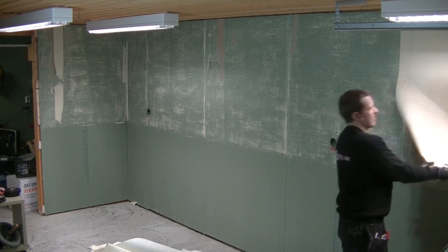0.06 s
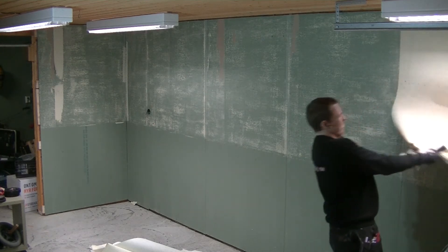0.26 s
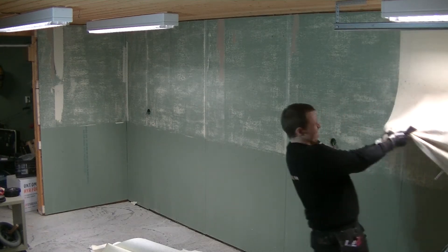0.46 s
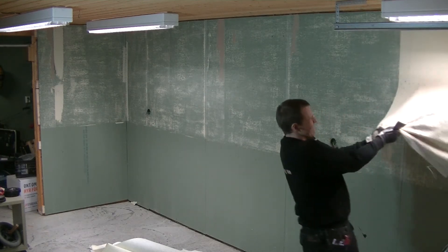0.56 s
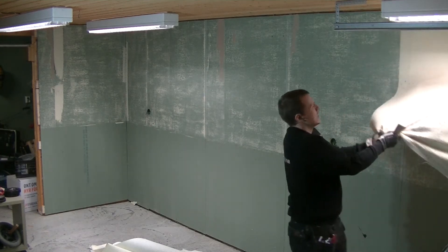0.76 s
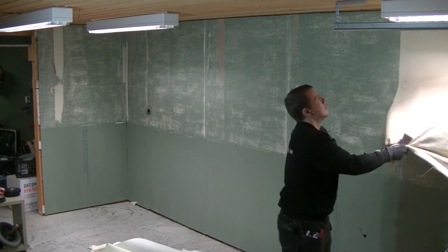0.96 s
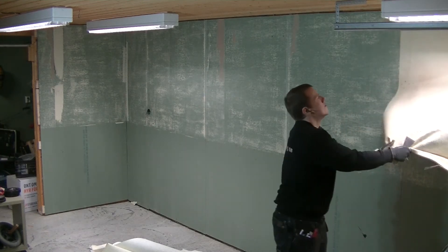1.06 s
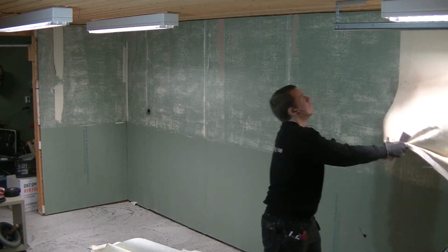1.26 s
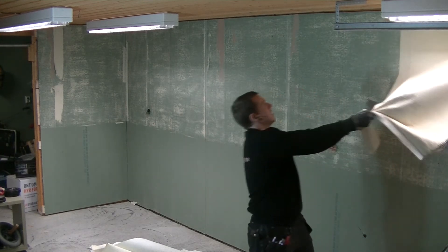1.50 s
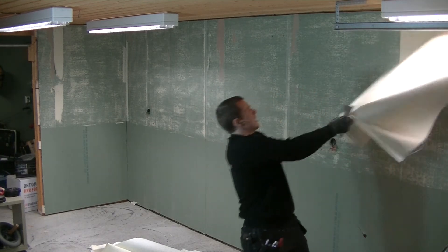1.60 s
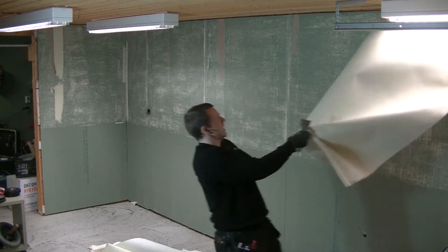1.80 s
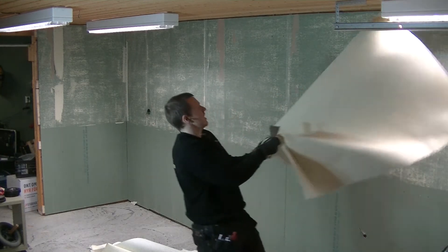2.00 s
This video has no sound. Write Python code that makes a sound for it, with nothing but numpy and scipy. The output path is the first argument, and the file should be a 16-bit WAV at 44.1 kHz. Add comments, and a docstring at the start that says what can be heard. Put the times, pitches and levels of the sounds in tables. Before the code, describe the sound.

Wall covering is ripped off a garage wall in two loud, crackling pulls. The sheet rustles and cracks taut first, crinkles faintly between the pulls, then flaps and scrapes lightly. The bare room adds a short echo.

```python
"""A slack sheet of wall covering rustles, cracks taut and is torn off a garage wall in two long pulls.
Glue and paper fibres part by stick-slip, in dense, jerky snaps that rattle the sheet and drum on the
wallboard. Between pulls the sheet crinkles as it buckles, and two small ticks sound close by.
After the second pull it flaps and scrapes. The bare room reverberates over a faint, steady hush."""
import sys
import numpy as np
from scipy import signal
from scipy.fft import rfft, irfft
from scipy.io import wavfile
from scipy.ndimage import uniform_filter1d, minimum_filter1d

SR = 44100
rng = np.random.default_rng(int(sys.argv[2]) if len(sys.argv) > 2 else 0)


def materialize(psi):
    """Save the field psi as 16-bit PCM at rate SR to the path in sys.argv[1].

    A 1-D psi becomes a single channel; in a 2-D psi each row is a channel.
    """
    bounded = np.clip(np.atleast_2d(psi).T, -1, 1)
    quanta = np.round(bounded * 32767).astype(np.int16)
    wavfile.write(sys.argv[1], SR, quanta)


N = 90404
T = np.arange(N) / SR
HZ = np.maximum(np.fft.rfftfreq(N, 1 / SR), 1)


def undb(db):
    """Amplitude ratio: tenfold for every 20 dB."""
    return 10 ** (np.asarray(db) / 20)


def unit(x):
    """Normalisation to an rms of 1."""
    return x / np.sqrt(np.mean(x ** 2))


def at_hz(points, hz):
    """Interpolation of (f/Hz, value) points on a log-frequency axis."""
    f, value = np.array(points).T
    return np.interp(np.log(hz), np.log(f), value)


def colour(x, tone, band=1):
    """Spectral shaping of a white signal at constant power: the levels of a tone are relative."""
    return irfft(rfft(x) * unit(undb(at_hz(tone, HZ)) * band), N)


def envelope(rows, column, edge_s=.006):
    """Amplitude envelope from a level curve, with exponential decay beyond its ends."""
    rows = np.array(rows)
    outside = np.maximum(rows[0, 0] - T, 0) + np.maximum(T - rows[-1, 0], 0)
    return undb(np.interp(T, rows[:, 0], rows[:, column])) * np.exp(-outside / edge_s)


def swells(rows):
    """Gaussian pulses of force; each width is a standard deviation."""
    return sum(undb(db) * np.exp(-.5 * ((T - s) / width) ** 2) for s, width, db in rows)


def snaps(per_s=6000, spread_db=3.5, jerks_per_s=240, jerk_db=3):
    """Stick-slip: random impulses of uneven size, stronger and weaker in jerks."""
    size = undb(spread_db * np.clip(rng.standard_normal(N), -2, 2)) * rng.choice([-1, 1], N)
    jerks = np.interp(T * jerks_per_s, np.arange(N), np.clip(rng.standard_normal(N), -2, 2))
    impulses = rng.random(N) < per_s / SR
    return unit(impulses * size * undb(jerk_db * jerks))


def bursts(rows, tone):
    """Damped transients: noise with a sudden onset and exponential decay."""
    shape = sum(undb(db) * (T >= s) * np.exp(-abs(T - s) / decay) for s, db, decay in rows)
    return colour(shape * rng.standard_normal(N), tone)


# spectra of the still air, common to both ears and opposed between them (f/Hz, level/dB)
AIR_MID = [(25, 3), (55, 2), (130, -13), (800, -13.5), (2500, -21), (6000, -15.5), (15500, -24.5)]
AIR_SIDE = [(40, -13), (140, -7), (450, -0.5), (1100, -15), (2500, -10), (5500, -16.5), (9000, -36.5)]
def still_air():
    """Ambient noise: independent mid and side signals give a steady hush its width."""
    mid = undb(-63) * colour(rng.standard_normal(N), AIR_MID)
    side = undb(-74.5) * colour(rng.standard_normal(N), AIR_SIDE)
    return mid, side


# rustle of the loose sheet (t/s, crinkle level/dB, flutter level/dB)
SLACK_LEVELS = [(0, -44, -48), (.07, -53, -55), (.13, -47.5, -47.5), (.2, -42, -54), (.72, -36, -41.5),
                (.77, -63, -47), (.805, -63, -44), (.828, -65, -46), (.96, -66.5, -70), (1.06, -62, -66),
                (1.18, -67.5, -70.5), (1.3, -72.5, -77), (1.35, -65, -64.5), (1.385, -55.5, -62.5),
                (1.78, -36, -54), (1.86, -69, -67), (1.885, -51, -48), (1.93, -53, -43), (2.0, -48, -44),
                (2.05, -65, -55)]
# spectra of its two parts (f/Hz, level/dB)
CRINKLE_TONE = [(1000, -12.5), (2000, -2), (3300, -1), (4200, 0.5), (5500, -3.5), (7000, -5.5),
                (9000, -10.5), (11000, -15), (15500, -16)]
FLUTTER_TONE = [(40, -21.5), (120, -3), (220, -5), (340, 3.5), (450, 2), (800, 7.5), (1200, 0), (2000, -8),
                (4000, -46)]
def slack_sheet():
    """Buckling: the loose covering gives way in small crinkles and flutters as it swings."""
    buckles = snaps(per_s=1700, spread_db=1)
    crinkle = envelope(SLACK_LEVELS, 1) * colour(buckles, CRINKLE_TONE)
    flutter = envelope(SLACK_LEVELS, 2) * colour(buckles, FLUTTER_TONE)
    return crinkle + flutter


# cracks as each pull begins (t/s, level/dB, decay time/s) and their spectrum (f/Hz, level/dB)
TAUT_CRACKS = [(.166, -27.5, 0.0045), (.179, -38, .008), (.198, -28.5, .003), (1.434, -35.5, 0.0034),
               (1.4495, -19.5, 0.0045)]
TAUT_TONE = [(40, -14), (130, -3), (400, -2), (900, 0), (2500, -8), (5000, -6), (10000, -16), (15500, -24)]
def taut_cracks():
    """Impulsive excitation: sudden tension makes the sheet crack."""
    return bursts(TAUT_CRACKS, TAUT_TONE)


# the pulls, in relative levels (t/s, crackle level/dB, rattle level/dB, rumble level/dB)
PULL_1 = [(.19, -33.5, -42, -63), (.202, -27.5, -28, -37.5), (.228, -17, -23, -31),
          (.268, -18.5, -21.5, -55), (.295, -13, -21, -37), (.355, -10, -11.5, -27), (.385, -18, -15, -31),
          (.43, -22, -14, -27.5), (.465, -24.5, -26, -39), (.505, -25, -23.5, -43), (.575, -24, -24, -31),
          (.632, -22.5, -25, -36), (.665, -34, -40.5, -33.5), (.7, -50, -48, -52.5)]
PULL_2 = [(1.4, -48, -60, -59), (1.422, -36, -51, -60), (1.44, -29.5, -35, -41), (1.452, -21, -23, -34),
          (1.462, -28, -31.5, -32), (1.488, -14, -17.5, -29), (1.54, -16, -15.5, -25),
          (1.592, -19, -15.5, -47), (1.63, -21, -26.5, -42), (1.657, -23, -27.5, -34),
          (1.698, -24, -25.5, -53), (1.732, -25, -27, -40), (1.765, -38, -29.5, -57),
          (1.795, -52, -55, -48)]
# spectra early and late in each pull (f/Hz, level/dB)
EARLY_TONE_1 = [(25, -27), (55, -33), (90, -2), (140, -9), (260, -1.5), (420, -1), (600, 4), (800, -2.5),
                (1050, -3), (1520, -4.5), (2400, -11.5), (3500, -8.5), (4800, -7), (6500, -8.5),
                (7500, -8.5), (9400, -7), (12400, -16.5), (14000, -13.5), (15500, -24)]
LATE_TONE_1 = [(25, -30.5), (55, -46), (93, -9), (170, -13), (240, -5.5), (340, -5), (430, 1.5),
               (590, -3.5), (900, -7.5), (1200, -9), (1700, -13), (2900, -15.5), (4300, -15.5), (6200, -16),
               (9500, -19.5), (12500, -21.5), (15500, -27)]
EARLY_TONE_2 = [(25, -30), (45, -19), (80, -10), (150, -8), (280, -7), (380, -1), (570, -3), (780, 0),
                (950, -2), (1080, -9), (1350, -7), (2000, -12), (2700, -21), (4000, -12.5), (5400, -10),
                (7000, -14), (8500, -17), (9700, -16.5), (10900, -14.5), (12900, -19), (15500, -16)]
LATE_TONE_2 = [(25, -32), (100, -17), (200, -7.5), (350, -8.5), (440, 4), (530, -3), (780, -3.5), (950, -6),
               (1080, -10.5), (1300, -6.5), (1700, -12.5), (3000, -12.5), (4000, -12.5), (6500, -13.5),
               (8200, -9), (10700, -16.5), (13000, -16), (15500, -18.5)]
def tearing(rumble_top_hz=220, rattle_top_hz=2500, shift_s=.04):
    """Fracture: parting fibres crackle, rattle the sheet and shake the wall in forced vibration."""
    below_rumble = 1 / (1 + (HZ / rumble_top_hz) ** 8)
    below_rattle = 1 / (1 + (HZ / rattle_top_hz) ** 8)
    # fibre crackle, sheet rattle, wallboard rumble (band, gain/dB)
    bands = [(1 - below_rattle, -.5), (below_rattle - below_rumble, 2), (below_rumble, 2.5)]
    pulls = [(PULL_1, EARLY_TONE_1, LATE_TONE_1, .37), (PULL_2, EARLY_TONE_2, LATE_TONE_2, 1.61)]
    sound = 0
    for levels, early, late, shift_at_s in pulls:
        fibres = snaps()
        freed = np.clip((T - shift_at_s) / shift_s + .5, 0, 1)  # the tone shifts as sheet comes free
        for column, (band, db) in enumerate(bands, 1):
            vibration = (1 - freed) * colour(fibres, early, band) + freed * colour(fibres, late, band)
            sound = sound + undb(db) * envelope(levels, column) * vibration
    return sound


# spurts of tearing (t/s, width/s, level/dB) and their spectrum (f/Hz, level/dB)
TEAR_SPURTS = [(.283, 0.0046, -6), (.325, 0.024, -12.5), (1.59, 0.014, -12.5)]
TEAR_SPURT_TONE = [(200, -8), (700, 3), (1500, -4), (2800, -12), (4700, 2), (6300, 1), (7500, -3),
                   (9200, -2), (11500, -9), (15500, -9)]
def spurts():
    """Sudden fracture: many fibres part in one short run of snaps."""
    return swells(TEAR_SPURTS) * colour(snaps(), TEAR_SPURT_TONE)


# hard tugs on the wallboard (t/s, width/s, level/dB)
BOARD_TUGS = [(.385, .016, -20), (.422, .01, -20.5), (.615, .015, -31), (1.58, .02, -30)]
# its modes (f/Hz, bandwidth/Hz, relative level/dB)
BOARD_MODES = [(158, 30, -4), (223, 12, 18), (376, 11, -5), (430, 32, -2.5), (614, 18, -8.5),
               (788, 20, -14.5), (1006, 33, -13.5), (1320, 22, -22), (1460, 20, -25)]
def wallboard():
    """Resonance: hard tugs set the board drumming in its damped modes."""
    force = swells(BOARD_TUGS) * snaps()
    response = sum(undb(db) / (1 + 1j * (HZ ** 2 - hz ** 2) / (HZ * width))
                   for hz, width, db in BOARD_MODES)
    return irfft(rfft(force) * response / np.sqrt(np.mean(abs(response) ** 2)), N)


# ticks between the pulls (t/s, level/dB, decay time/s) and their spectrum (f/Hz, level/dB)
NEAR_TICKS = [(1.208, -55, 0.0011), (1.251, -50.5, 0.00075)]
NEAR_TICK_TONE = [(1000, -35), (6000, -12), (8500, -6), (11000, -16), (15500, -15)]
def ticks():
    """Direct sound: small, bright ticks close by, heard without echoes."""
    return bursts(NEAR_TICKS, NEAR_TICK_TONE)


# flap after the second pull (t/s, level/dB, decay time/s) and its spectrum (f/Hz, level/dB)
SHEET_FLAP = [(1.875, -31, 0.033)]
SHEET_FLAP_TONE = [(40, -9), (120, -15), (210, 2.5), (340, 2), (450, 5.5), (700, -2.5), (1200, -4),
                   (3000, -19), (15500, -45)]
def flap():
    """Air displacement: the loose sheet flaps once with a dull, damped burst."""
    return bursts(SHEET_FLAP, SHEET_FLAP_TONE)


# closing scrapes (t/s, width/s, level/dB) and their spectrum (f/Hz, level/dB)
SHEET_SCRAPES = [(1.885, 0.01, -42), (1.98, 0.028, -46.5)]
SHEET_SCRAPE_TONE = [(1000, -27), (3500, -21), (4050, 4.5), (4600, -9), (5600, -10), (6400, 2), (7500, -3),
                     (9200, -4), (11000, -14), (15500, -19)]
def scrapes():
    """Sliding friction: the freed sheet scrapes with a thin rasp."""
    return swells(SHEET_SCRAPES) * colour(snaps(), SHEET_SCRAPE_TONE)


# reverberation time of the garage (f/Hz, T60/s) and gain of its echoes (f/Hz, level/dB)
GARAGE_T60 = [(60, 0.16), (220, 0.56), (800, .5), (4000, 0.505), (8000, 0.3961), (12000, 0.31),
              (16000, 0.22)]
GARAGE_TONE = [(60, 3), (300, 0.5), (5000, 3), (9000, -0.5), (15000, -1)]
def echoes(x, gap_s=.0032):
    """Diffuse reverberation between bare walls: deep bass and high treble decay fastest."""
    t = T[:32768]
    hz = np.maximum(np.fft.rfftfreq(len(t), 1 / SR), 1)
    noise = rfft(rng.standard_normal(len(t)))
    centres_hz = [60, 220, 800, 2000, 4000, 6000, 8000, 11000, 16000]
    tail = 0
    for centre, pick in zip(centres_hz, np.eye(len(centres_hz))):
        fade = (t > gap_s) * np.exp(-np.log(1000) * t / at_hz(GARAGE_T60, centre))
        band = irfft(noise * np.interp(np.log(hz), np.log(centres_hz), pick))
        tail = tail + band * undb(at_hz(GARAGE_TONE, centre)) * fade / np.sqrt(np.sum(fade ** 2))
    return signal.fftconvolve(x, tail)[:N]


def garage(x, patterns=4, change_s=.045):
    """Moving source: echo patterns take turns, as paths change when the tear travels along the wall."""
    place = (T // change_s) % patterns
    return sum(echoes(x * uniform_filter1d(1. * (place == k), size=128)) for k in range(patterns))


# weighting of the echoes in the side signal (f/Hz, relative level/dB)
WIDTH_TONE = [(60, -48), (180, -27.5), (350, -16.5), (700, -38.5), (1400, -40), (2800, -8), (5000, -18.5),
              (8500, -58), (11000, -69.5)]
def room_width(x, gain_db=-7):
    """Interaural decorrelation: weak echoes make the sound slightly unlike at the two ears."""
    return irfft(rfft(echoes(x)) * undb(gain_db + at_hz(WIDTH_TONE, HZ)), N)


def scene():
    """Superposition: sheet, wall and room add in mid and side, almost the same in both ears."""
    sheet = tearing() + spurts() + wallboard() + taut_cracks() + slack_sheet() + flap() + scrapes()
    echo_gain = undb(-4)
    in_room = (sheet + echo_gain * garage(sheet)) / np.hypot(1, echo_gain)
    air_mid, air_side = still_air()
    mid = in_room + ticks() + air_mid
    side = room_width(sheet) + air_side
    return np.array([mid + side, mid - side])


def record(dry, threshold=.37, ratio=3, release_s=.012, top_hz=15750):
    """Dynamic range compression holds down the loudest peaks; a steep low-pass cuts the top."""
    peak = -minimum_filter1d(-abs(dry).max(axis=0), size=64)
    release_samples = release_s * SR
    smoothed = signal.lfilter([1], [1, -np.exp(-1 / release_samples)], peak) / release_samples
    held = np.maximum(peak, smoothed)
    gain = np.minimum(1, threshold / (held + 1e-9)) ** (1 - 1 / ratio)
    lowpass = signal.ellip(12, .2, 90, top_hz, fs=SR, output="sos")
    return signal.sosfilt(lowpass, dry * uniform_filter1d(gain, size=48))


dry = scene()
out = record(dry)
materialize(out)
```